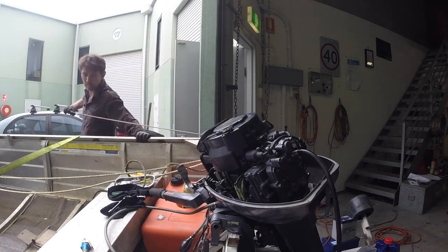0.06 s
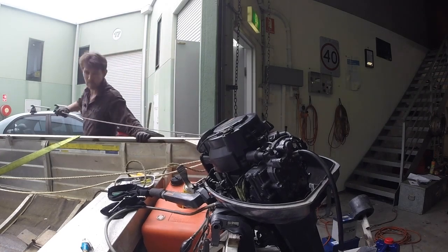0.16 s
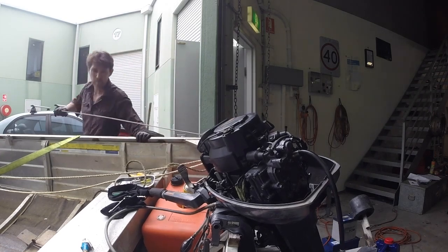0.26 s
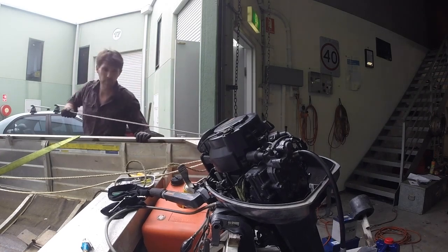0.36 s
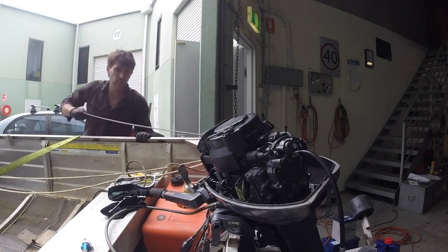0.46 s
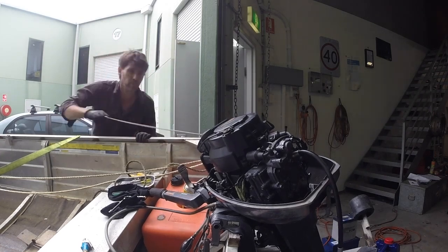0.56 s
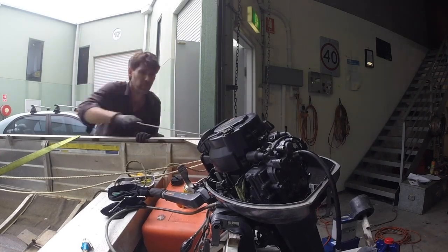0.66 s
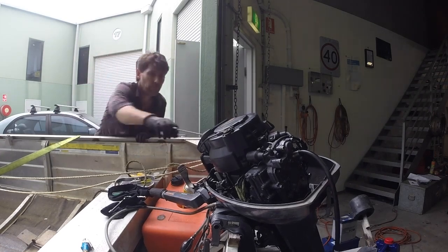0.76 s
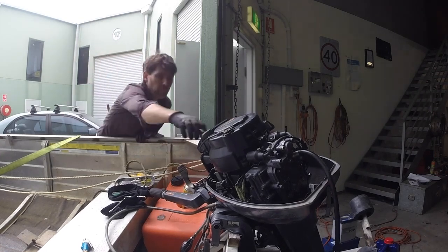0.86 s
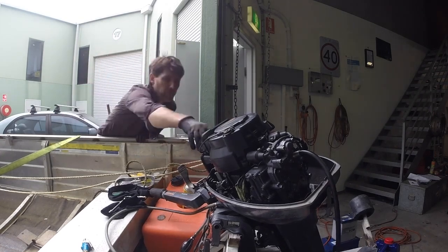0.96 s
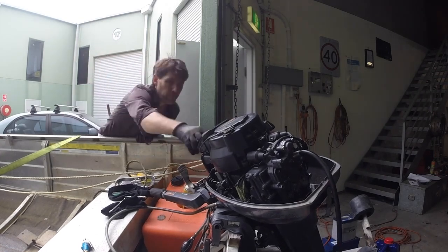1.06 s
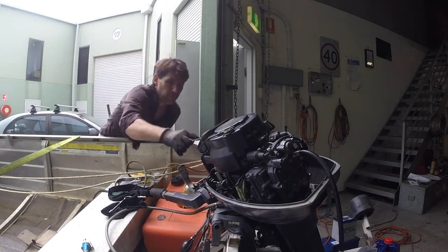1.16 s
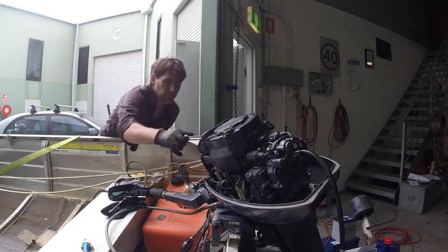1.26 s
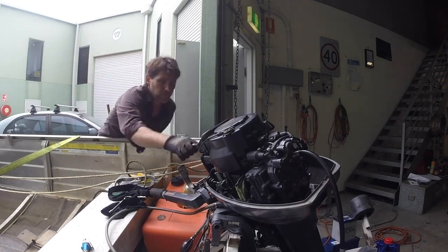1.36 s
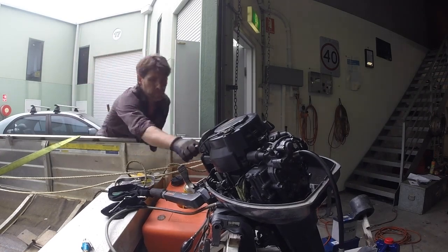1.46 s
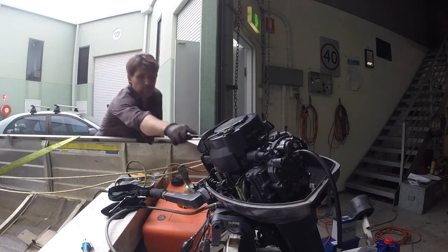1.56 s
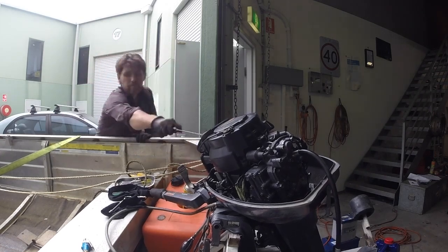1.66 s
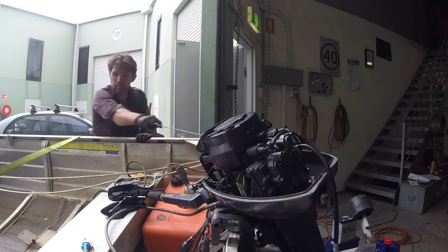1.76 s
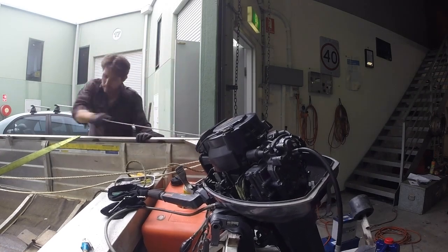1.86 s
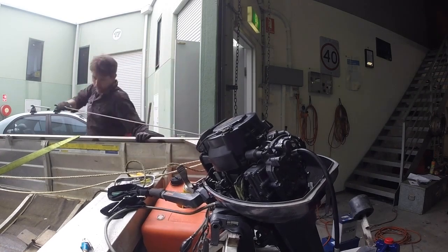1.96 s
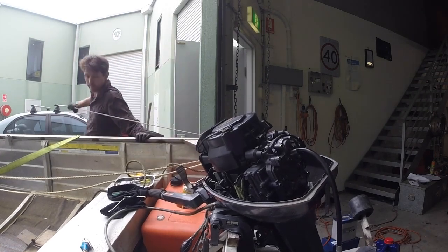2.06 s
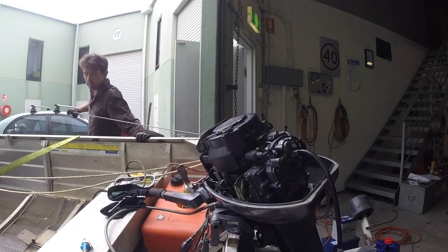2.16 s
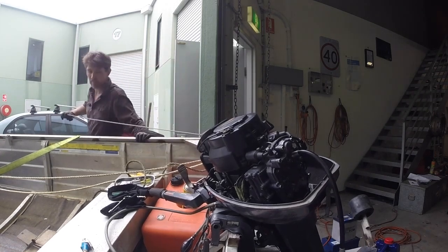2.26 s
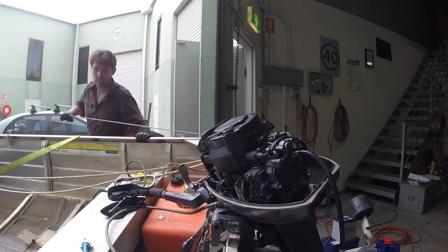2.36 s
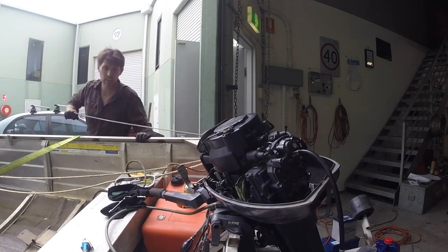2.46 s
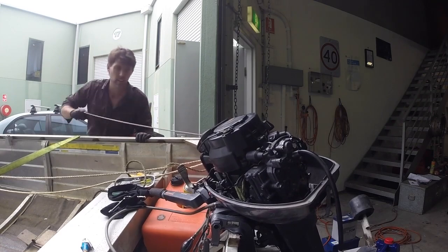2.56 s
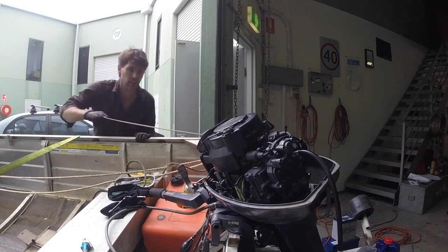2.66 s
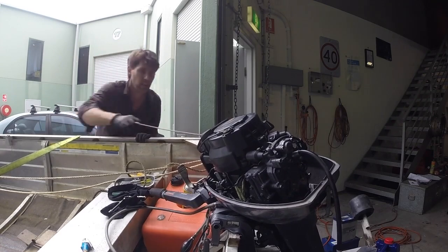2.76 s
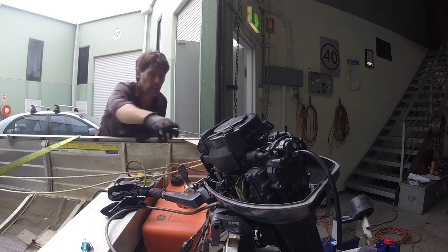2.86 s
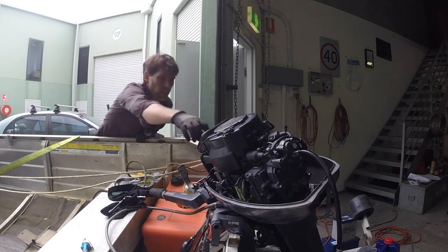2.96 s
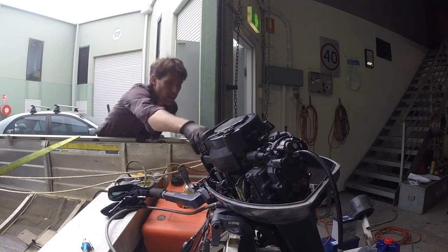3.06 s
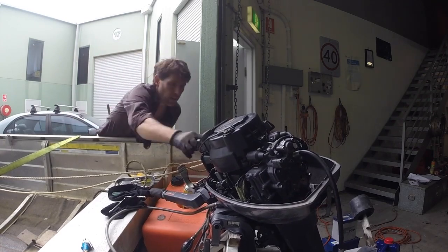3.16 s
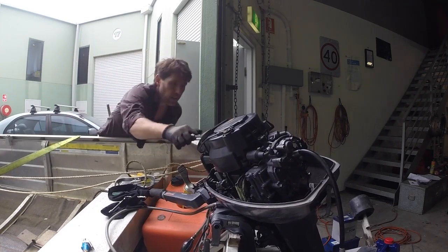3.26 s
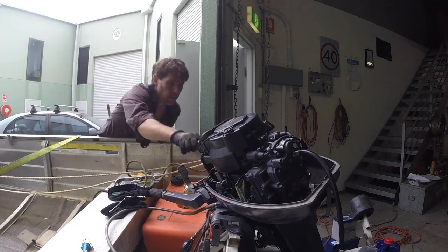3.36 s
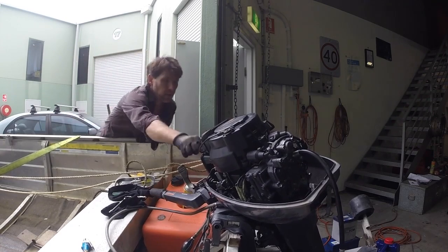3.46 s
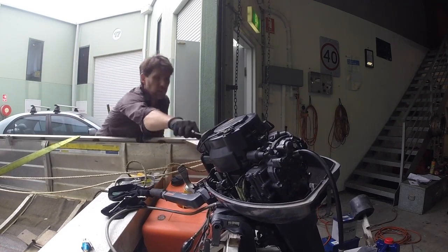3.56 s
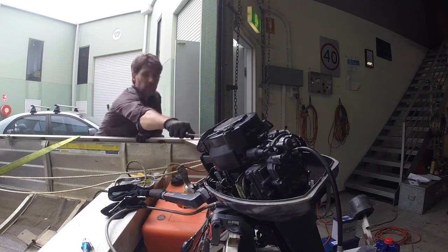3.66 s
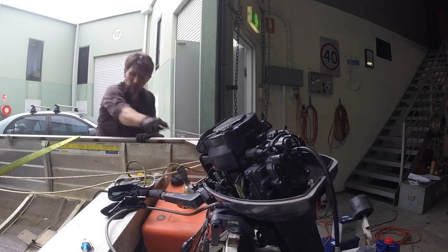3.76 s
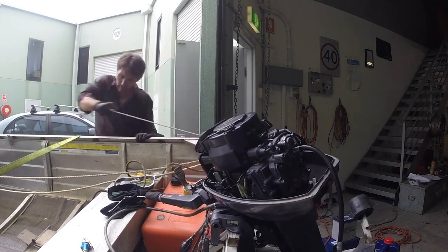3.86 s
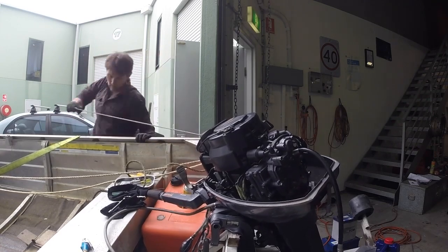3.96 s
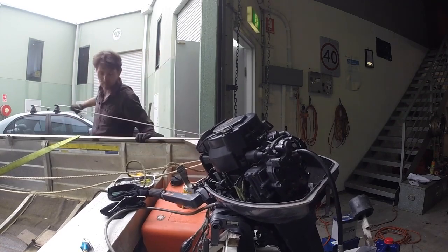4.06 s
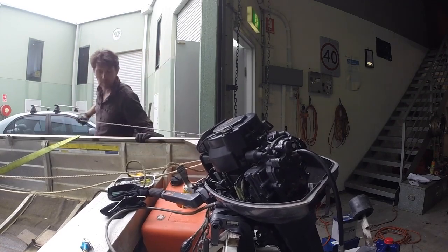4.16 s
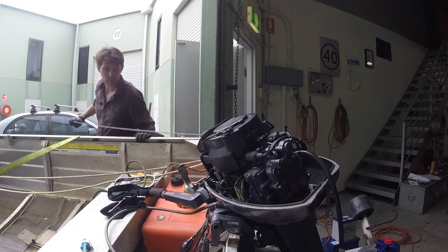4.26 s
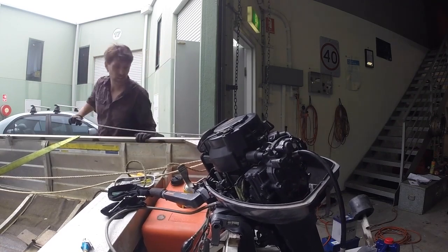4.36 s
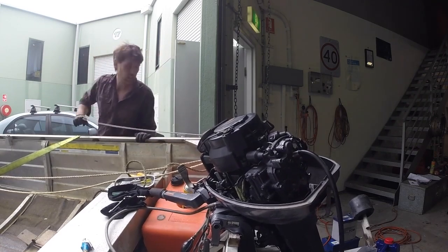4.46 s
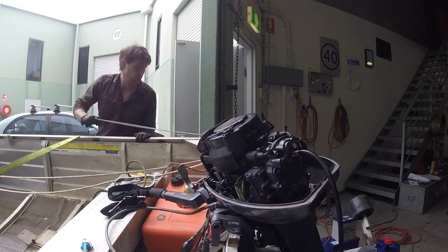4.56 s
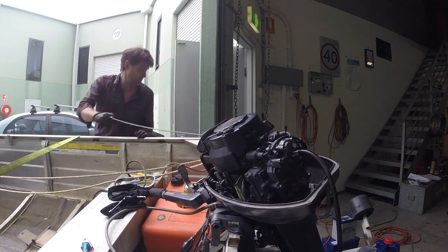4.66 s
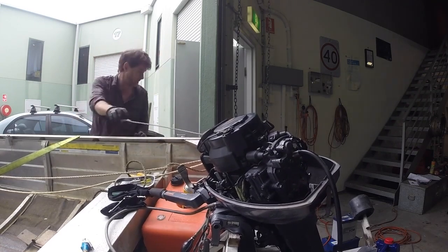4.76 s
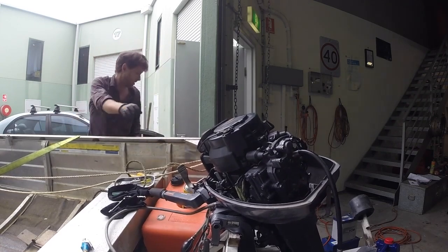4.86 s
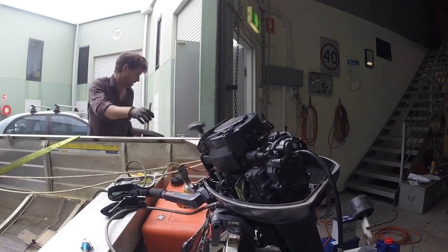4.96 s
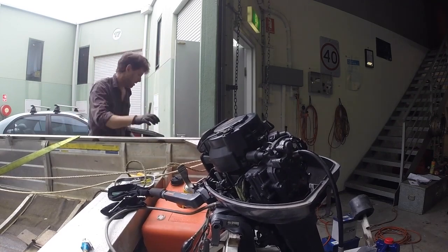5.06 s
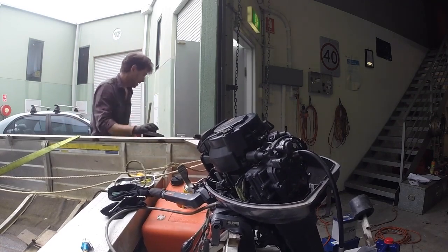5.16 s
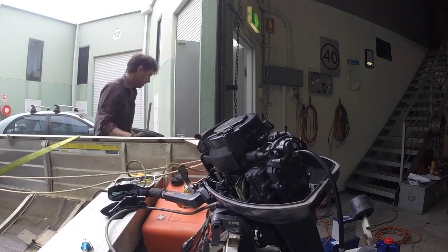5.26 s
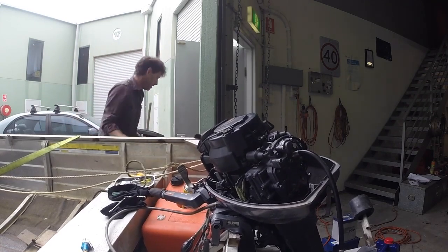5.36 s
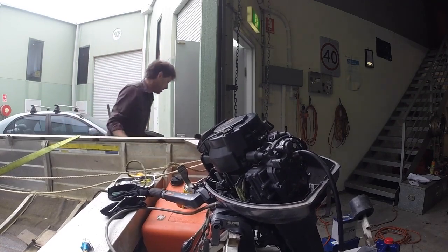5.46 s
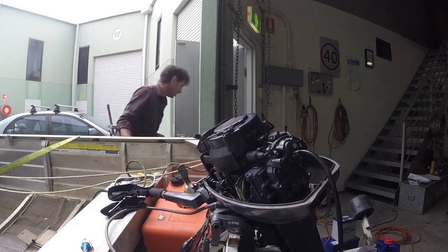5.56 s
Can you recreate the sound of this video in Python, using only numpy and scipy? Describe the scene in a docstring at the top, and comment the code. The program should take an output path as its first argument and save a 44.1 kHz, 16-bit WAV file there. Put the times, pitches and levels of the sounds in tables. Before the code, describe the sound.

Close to an uncovered small outboard in a workshop doorway, a starter rope is pulled three times, about two seconds apart. Each quick pull brings a rough rising whirr, fast metallic clatter and thumps, a hard clack at full stretch, then slowing knocks and spring scrape. The engine never fires; finally the handle rattles against the ringing housing. Faint yard noise behind.

```python
"""Outboard motor on its recoil starter

A small two-cylinder outboard motor, cowl off, is pulled over three times by its rope and does not fire. Crank
speed drives clatter, air noise, piston thumps and knocks; the rope whirrs as a frequency-modulated tone.
Between pulls the spring scrapes and groans through drum resonances, pawls ring and air noise sighs, mostly from
a leaking cylinder. At last the handle rattles home against the ringing housing. Hull reflections, workshop
echoes and steady yard noise lie behind."""
import sys
import numpy as np
from scipy import signal
from scipy.fft import rfft, irfft, next_fast_len
from scipy.io import wavfile
from scipy.ndimage import uniform_filter1d

SR = 44100
rng = np.random.default_rng(int(sys.argv[2]) if len(sys.argv) > 2 else 0)


def wrap_up_sound(samples):
    """Save the sound to the file named by the first command line argument, as 16-bit audio."""
    columns = np.atleast_2d(samples).T
    # keep every value between -1 and 1, then stretch to whole-number steps
    tamed = np.clip(columns, -1, 1)
    steps = np.round(tamed * 32767).astype(np.int16)
    wavfile.write(sys.argv[1], SR, steps)


N = 248139
TIME = np.arange(N) / SR
SIZE = next_fast_len(N + 2 * SR, real=True) // 2 * 2   # padded transform length, even
HZ = np.maximum(np.fft.rfftfreq(SIZE, 1 / SR), 1)

# pulls on the starter: rope runs out t/s, limiting speed/(turns/s), coasting time/s, crank angle then/turns
PULLS = [(.168, 13.17, .522, -.177), (2.204, 13.92, .724, .333), (4.24, 13.03, .679, .331)]
# bracket resonances: f/Hz, width/Hz (before any broadening), relative level/dB
BRACKET_MODES = [(413, 122, -0.5), (548, 60, 0.5), (783, 140, -5), (794, 57, 3), (1077, 43, -1.5),
                 (1420, 330, -24.5)]
# resonances of the steel parts: f/Hz, width/Hz, relative level/dB
STEEL_MODES = [(2840, 290, 3.5), (3690, 160, 0.5), (4030, 150, -0.5), (4800, 1600, -8), (6260, 220, 5.5),
               (7460, 1400, -6), (9200, 310, -4), (11210, 500, -2), (14500, 470, -6.5)]
# clatter of the turning crank: relative level at full speed/dB, exponent of speed
CLATTER_LAW = (-19, 1.456)
RATTLE_ABOVE = .3   # share of full speed below which drive and loose metal stay put


def from_db(db):
    """Decibels to amplitude ratio: 20 dB is a factor of ten."""
    return 10 ** (np.asarray(db) / 20)


def rms_one(x):
    """Normalisation to unit root mean square."""
    return x / np.sqrt(np.mean(x ** 2) + 1e-20)


def at_hz(points):
    """Linear interpolation over log frequency, read on the frequency grid."""
    hz, value = np.transpose(points)
    return np.interp(np.log(HZ), np.log(hz), value)


def level(tables, axis):
    """Envelope interpolated in decibels from one column; silent outside each table."""
    out = np.zeros(N)
    for rows in map(np.array, tables):
        out += from_db(np.interp(TIME, rows[:, 0], rows[:, axis], left=-150, right=-150))
    return uniform_filter1d(out, SR // 200)


def noise():
    """White noise: independent Gaussian samples with a flat spectrum."""
    return rng.standard_normal(N)


def drift(rate):
    """Low-pass noise of unit rms: smooth random variation up to about the given rate in Hz."""
    return rms_one(irfft(rfft(noise(), SIZE) / (1 + (HZ / rate) ** 2), SIZE)[:N])


def colour(x, spectrum):
    """Minimum-phase filter by the folded cepstrum, with unit power gain."""
    cepstrum = irfft(np.log(rms_one(from_db(at_hz(spectrum))) + 1e-6), SIZE)
    cepstrum[1:SIZE // 2] *= 2
    cepstrum[SIZE // 2 + 1:] = 0
    return irfft(rfft(x, SIZE) * np.exp(rfft(cepstrum)), SIZE)[:N]


def resonate(x, hz, width):
    """Two-pole resonance of about unit gain at its peak; the width sets the damping."""
    r = np.exp(-np.pi * width / SR)
    zeros = np.array([1, 0, -1]) * (1 - r * r) / 2
    poles = [1, -2 * r * np.cos(2 * np.pi * hz / SR), r * r]
    return signal.lfilter(zeros, poles, x + 1e-18)


def body(x, modes):
    """Modal superposition: parallel resonances, neighbours in opposite phase."""
    return sum((-1) ** k * from_db(db) * resonate(x, hz, width) for k, (hz, width, db) in enumerate(modes))


def ring_apart(modes, per_s, widen):
    """Independent excitation: each resonance, applied twice, gets its own random impacts."""
    out = 0
    for hz, width, db in modes:
        once = resonate(grains(per_s, spread_db=2.5), hz, widen * width)
        out = out + from_db(db) * resonate(once, hz, widen * width)
    return rms_one(out)


def bursts(rows, rise, decay):
    """Impact envelope: exponential rise and decay, in s, from each (t/s, level/dB)."""
    out, age = np.zeros(N), np.arange(SR // 5) / SR
    shape = (1 - np.exp(-age / rise)) * np.exp(-age / decay)
    for s, db in rows:
        part = out[max(int(s * SR), 0):][:len(age)]
        part += from_db(db) * shape[:len(part)]
    return out


def grains(per_s, spread_db):
    """Shot noise: random tiny contacts of uneven size and either sign, normalised to unit rms."""
    sizes = from_db(spread_db * np.minimum(rng.exponential(1, N), 3)) * rng.choice([-1, 1], N)
    return rms_one(sizes * (rng.random(N) < per_s / SR) / np.sqrt(per_s))


def yard():
    """Stationary background noise of the quiet yard, with a shaped spectrum."""
    # spectrum: f/Hz, relative level/dB
    yard_spectrum = [(25, -36.5), (70, -9), (150, 0.5), (300, -5.5), (700, -8.5), (1300, -9.5),
                     (2200, -18.5), (3300, -23), (7000, -24), (15500, -49.5)]
    return from_db(-59.5) * colour(noise(), yard_spectrum)


def workshop(x):
    """Reverberation: ten recirculating echo paths decay by frequency, then allpass filters smear them."""
    # reverberation time: f/Hz, t60/s
    room_t60 = [(100, 0.45), (1000, 0.75), (4000, 1), (8000, 0.19), (15000, 0.23)]
    t60, response = at_hz(room_t60), 0
    for k, lag in enumerate(rng.uniform(.012, .06, 10)):
        loop = from_db(-60 * lag / t60) * np.exp(-2j * np.pi * HZ * lag)
        response = response + (-1) ** k * loop / (1 - loop)
    for lag in rng.uniform(0.000998, .006, 3):   # clutter smears each echo
        delay = np.exp(-2j * np.pi * HZ * lag)
        response = response * (delay - .6) / (1 - .6 * delay)
    return irfft(rfft(x, SIZE) * response, SIZE)[:N]


def hull(x):
    """Early reflections: five delayed copies from the metal hull and the fuel tank."""
    response = sum(rng.choice([-1, 1]) * np.exp(-2j * np.pi * HZ * lag) for lag in rng.uniform(.002, .012, 5))
    return irfft(rfft(x, SIZE) * response, SIZE)[:N]


def housing():
    """Modal ringing: the handle snaps home and its rattle excites the starter housing."""
    # handle against the housing: t/s, relative level/dB
    handle_hits = [(5.075, -34), (5.114, -29.5), (5.18, -30), (5.215, -38)]
    # housing modes: f/Hz, relative level/dB, t60/s
    housing_modes = [(854, 2.5, 0.17), (901, -4, 0.24), (1025, 1, 0.24), (1090, -4, 0.26),
                     (1545, -3.5, 0.33), (2225, -3.5, 0.16), (3560, -12, 0.32), (3860, -12.5, 0.14)]
    rattle = noise() * bursts(handle_hits, rise=0.0017, decay=0.011)
    modes = [(hz, np.log(1000) / (np.pi * t60), db) for hz, db, t60 in housing_modes]   # t60 to width
    return from_db(33.5) * body(rattle, modes)


def swell(s, rise, db, fall_db_per_s):
    """Hiss envelope: opens at s, swells, holds, then decays exponentially."""
    swell_db, hold_s = 10.5, 0.036
    age = TIME - s
    loss_db = swell_db * np.clip(1 - age / rise, 0, 1) + fall_db_per_s * np.maximum(age - rise - hold_s, 0)
    return uniform_filter1d(from_db(db - loss_db) * (age > 0), SR // 200)


def sighs():
    """Leakage noise: mostly air squeezed past the rings, plus a short hiss as the rope takes up; the treble
    falls faster as each fades."""
    # hisses, mostly a compressed cylinder leaking, the one at 3.835 s the rope taking up: t/s, rise/s, relative
    # level/dB, relative treble level/dB
    hisses = [(1.322, 0.034, -29.5, -42), (3.338, 0.051, -29, -43.5), (3.835, 0.014, -50.5, -45.5),
              (5.02, 0.064, -27.5, -38)]
    # spectra of the main sound and of the treble: f/Hz, relative level/dB
    main_spectrum = [(60, -25.5), (120, -23.5), (175, -3.5), (280, -15.5), (520, 0), (800, 0.5),
                     (1220, -1.5), (1600, -1.5), (2200, -13), (3100, -8), (4500, -13.5), (6500, -26),
                     (10000, -46.5)]
    treble_spectrum = [(2650, -22.5), (4500, -11.5), (5650, 5), (11300, -6), (14300, -13.5), (15500, -28)]
    main_gain = sum(swell(s, rise, db, fall_db_per_s=122) for s, rise, db, _ in hisses)
    treble_gain = sum(swell(s, rise, db, fall_db_per_s=178.5) for s, rise, _, db in hisses)
    treble = colour(noise(), treble_spectrum) * treble_gain
    return colour(noise(), main_spectrum) * main_gain + from_db(-1.0) * treble


def rewinding():
    """Sliding speed as half-sine arches (peak 1), and the loudness as a power of that speed."""
    # spurts of rope and spring, mostly winding in: t/s, length/s, relative level/dB
    spurts = [(0.476, .15, -40.5), (0.617, 0.35, -37), (.955, 0.068, -38), (1.287, .05, -40),
              (1.903, 0.083, -31), (2.572, 0.19, -45), (2.752, .29, -38.5), (3.047, 0.046, -38.5),
              (3.824, 0.12, -44.5), (3.946, 0.076, -28.5), (4.663, 0.33, -46.5), (4.985, 0.055, -42)]
    arches = [(np.sin(np.pi * np.clip((TIME - s) / length, 0, 1)), db) for s, length, db in spurts]
    speed = sum(arch for arch, _ in arches)
    return speed, sum(from_db(db) * arch ** 0.42 for arch, db in arches)


def coil_ticks():
    """Impact excitation: spring coils tick at random while winding in, ringing steel resonances."""
    ticks = ring_apart(STEEL_MODES, per_s=8.7, widen=1)
    # heard through the starter housing
    muffled = signal.sosfilt(signal.butter(2, 6500, fs=SR, output="sos"), ticks)
    return from_db(-14) * rms_one(muffled) * rewinding()[1]


def recoil():
    """Friction noise and chatter: the spring scrapes in its resonant drum and groans under load."""
    # drum resonances: f/Hz, width/Hz, relative level/dB
    drum_modes = [(570, 383, 9), (767, 160, -13.5), (1330, 390, 9.5), (1778, 300, 2.5), (2840, 900, -0.5),
                  (3880, 440, -44), (6100, 2000, -14.5), (10700, 410, -14.5)]
    # spring chattering as it takes the load: t/s, length/s, relative level/dB
    groan_rows = [(0.446, 0.041, -34), (1.779, .072, -34), (3.844, 0.034, -39.5)]
    groan_hz = 550
    drum, flutter = 0, drift(35)
    for hz, width, db in drum_modes:   # coils touch here and there: each resonance also flutters by itself
        scrape = grains(per_s=2500, spread_db=2.5) * from_db(2 * flutter + 2.0 * drift(27))
        drum = drum + from_db(db) * resonate(resonate(scrape, hz, width), hz, width)
    drum = rms_one(drum)
    gate = level([[(s, db), (s + length, db - 2)] for s, length, db in groan_rows], axis=1)
    phase = 2 * np.pi * groan_hz * np.cumsum(1 + 0.0049 * drift(84)) / SR
    groan = gate * (from_db(9.0) * np.sin(phase) + from_db(-19.5) * drum)
    return from_db(2.0) * drum * rewinding()[1] + groan


def whirr(hz, loudness):
    """Random frequency modulation: the braid running over the guide gives a rough tone and its octave."""
    phase = 2 * np.pi * np.cumsum(hz * (1 + 0.022 * drift(250))) / SR
    fundamental = np.sin(phase) * loudness * from_db(2.5 + 3.1 * drift(120))
    # the octave stops growing with loudness above a cap
    octave = np.sin(2 * phase) * np.minimum(loudness, from_db(-21)) * from_db(-10 + 3.8 * drift(120))
    return fundamental + octave


def rope():
    """Frictional tone: a pitch contour for each pull going out, pitch tied to sliding speed coming back."""
    # whirr, alike on every pull: t before the rope runs out/s, f/Hz, relative level/dB
    contour = [(.28, 730, -33.5), (.225, 930, -27.5), (.195, 970, -18), (.165, 1090, -31.5),
               (.143, 1220, -14), (.127, 1250, -14), (.113, 1510, -19.5), (.085, 1400, -29),
               (.045, 1500, -22.5), (0.024, 1280, -31)]
    pulls = [[(end - before, hz, db) for before, hz, db in contour] for end, *_ in PULLS]
    s, hz, _ = np.concatenate(pulls).T
    going = whirr(np.interp(TIME, s, hz), level(pulls, axis=2))
    speed, gain = rewinding()
    return_hz = 1168 + 354 * speed ** 2
    return going + whirr(return_hz, from_db(-7) * gain)


def crank(end, top, coast, angle):
    """Flywheel kinematics: exponential spin-up under the rope, then coasting; share of speed, and turns."""
    pull_s, spin_up_s = .31, .079   # length of the pull, time constant
    spin_up = 1 - np.exp(-np.maximum(TIME - end + pull_s, 0) / spin_up_s)
    share = spin_up * np.clip(1 - (TIME - end) / coast, 0, 1) ** 2
    turns = top * np.cumsum(share) / SR
    return share, turns - np.interp(end, TIME, turns) + angle


def driven(law):
    """Power law: gain over time of a sound that follows the crank speed."""
    top_db, power = law
    return from_db(top_db) * sum(crank(*pull)[0] for pull in PULLS) ** power


def each_turn(angle, law, count=1, above=0):
    """Phase-locked events (t/s, level/dB): the crank passes an angle count times a turn; weaker if slow."""
    rows, (top_db, power) = [], law
    for pull in PULLS:
        share, turns = crank(*pull)
        passes = np.flatnonzero(np.diff(np.floor((turns - angle) * count)))
        rows += [(i / SR, top_db + 20 * power * np.log10(share[i])) for i in passes if share[i] > above]
    return rows


def strokes():
    """Compression events (t/s, level/dB): two piston strokes a turn, and single nudges."""
    # piston nudged against compression: t/s, relative level/dB
    nudges = [(1.035, -33), (1.918, -28), (1.983, -15), (2.517, -32), (3.41, -43), (3.49, -41.5),
              (3.844, -39.5), (3.883, -27.5), (4.532, -31)]
    # strokes: relative level at full speed/dB, exponent of speed
    stroke_law = (-21, 1.5)
    return each_turn(.06, stroke_law, count=2) + nudges   # angle in turns past the clack of loose metal


def clacks():
    """Impact noise: steel, pawls and the whole starter answer short noise bursts."""
    # hard clacks as the starter comes to rest: t/s, relative level/dB
    rest_clacks = [(0.9635, -28), (1.256, -30), (3.054, -32), (3.0726, -39), (3.3395, -37), (5.025, -22),
                   (5.0458, -22)]
    # pawls tinkling as they swing out or drop back: t/s, relative level/dB
    pings = [(.463, -29.5), (.484, -31.5), (1.243, -25.5), (2.772, -33), (3.309, -36), (3.838, -34),
             (4.394, -29), (4.977, -37), (5.004, -33)]
    # jolts of the whole starter as it catches or stops: t/s, relative level/dB
    jolt_rows = [(.985, -32.5), (1.257, -30), (1.97, -17), (3.056, -38.5), (3.143, -51.5), (3.341, -37.5),
                 (5.03, -24.5), (5.049, -23.5), (5.113, -22)]
    # pawl resonances: f/Hz, width/Hz, relative level/dB
    pawl_modes = [(2940, 93, 3), (5900, 130, -8.5), (11300, 200, -3), (11350, 270, -12.5)]
    # jolt spectrum: f/Hz, relative level/dB
    jolt_spectrum = [(120, -31.5), (200, -11.5), (488, -9.5), (1030, -5), (1380, 1), (1910, -1.5),
                     (2170, -14.5), (2960, -4.5), (3610, -9.5), (4030, -12), (5800, -15), (6240, -12),
                     (8980, -29.5), (11400, -29.5), (15500, -35.5)]
    # loose metal: relative level at full speed/dB, exponent of speed
    clack_law = (-8.5, 1.23)
    turning = each_turn(0, clack_law, above=RATTLE_ABOVE)
    # the rope runs out with a bang: a jolt, then a clack 3.3 ms later
    end_clacks = [(end + 0.0033, -8.5) for end, *_ in PULLS]
    end_jolts = [(end, -9.5) for end, *_ in PULLS]
    steel = body(noise() * bursts(turning + end_clacks + rest_clacks, rise=0.00091, decay=0.0025), STEEL_MODES)
    pawls = body(noise() * bursts(pings, rise=0.00086, decay=0.0044), pawl_modes)
    jolts = colour(noise() * bursts(end_jolts + jolt_rows, rise=.001, decay=0.008), jolt_spectrum)
    return from_db(8.5) * steel + from_db(15.0) * pawls + from_db(4.5) * jolts


def knocks():
    """Damped oscillation: each soft blow swells briefly at its own pitch and also shakes the bracket."""
    # flywheel rocks, starter takes up or drops its slack: t/s, relative level/dB, f/Hz
    slack_knocks = [(.336, -18, 550), (.375, -13.5, 544), (.444, -19.5, 505), (.556, -21, 550),
                    (1.775, -21.5, 580), (1.969, -14, 600), (2.43, -15.5, 554), (2.477, -16.5, 541),
                    (2.58, -20, 522), (2.659, -26, 890), (3.796, -33, 610), (3.837, -21, 570),
                    (3.875, -20.5, 763), (3.974, -14.5, 587), (4.004, -9, 530), (4.498, -20.5, 535),
                    (4.524, -19, 540), (4.606, -27, 986), (4.719, -30, 1640), (5.114, -13.5, 750)]
    # drive knock, once a turn: relative level at full speed/dB, exponent of speed
    knock_law = (-10, 1)
    drive_hz, drive_angle = 802, -.315   # angle in turns past the clack of loose metal
    out, blows, age = np.zeros(N), np.zeros(N), np.arange(SR // 12) / SR
    shape = (1 - np.exp(-age / 0.0015)) ** 2 * np.exp(-age / 0.0047)
    turning = [(s, db, drive_hz) for s, db in each_turn(drive_angle, knock_law, above=RATTLE_ABOVE)]
    for s, db, hz in turning + slack_knocks:
        out[int(s * SR):][:len(age)] += from_db(db + 7.5) * shape * np.sin(2 * np.pi * hz * age)
        blows[int(s * SR):][:len(age)] += from_db(db + 18.5) * shape * rng.standard_normal(len(age))
    return out + body(blows, BRACKET_MODES)


def mount_knocks():
    """Impact excitation: gears and mounts knock at random as the crank turns, ringing the bracket."""
    rings = ring_apart(BRACKET_MODES, per_s=22, widen=2.0)
    return from_db(-4.5) * rings * driven(CLATTER_LAW)


def pistons():
    """Damped oscillation: the two cylinders thump in turn, one generally deeper than the other."""
    out, age = np.zeros(N), np.arange(SR // 10) / SR
    for k, (s, db) in enumerate(strokes()):
        hz = (135, 95)[k % 2] * np.exp(0.13 * rng.standard_normal())
        thump = np.sin(2 * np.pi * hz * age) * (1 - np.exp(-age / 0.0026)) * np.exp(-age / 0.0083)
        out[int(s * SR):][:len(age)] += from_db(db + 5) * thump
    return out


def cranking():
    """Speed-driven noise: contacts thin out as the crank slows, air dulls, each stroke puffs in the rumble."""
    # spectra: f/Hz, relative level/dB
    clatter_spectrum = [(150, -32), (250, -5), (321, -7), (451, 0), (699, 1), (812, -3), (1020, 1),
                        (1100, -15.5), (1290, -4.5), (1900, -9), (2240, -17.5), (2920, -23), (5000, -32.5),
                        (6500, -37.5), (11000, -120)]
    air_spectrum = [(1470, -28), (2500, -3), (3890, -7.5), (4930, -12), (6390, -10), (7010, -13),
                    (9730, -16.5), (12900, -16), (15500, -17.5)]
    rumble_spectrum = [(30, -33.5), (50, -9), (80, -8), (135, 0.5), (220, -1.5), (330, -15.5), (550, -40.5)]
    # air and rumble: relative level at full speed/dB, exponent of speed
    air_law = (-31, 2.24)
    rumble_law = (-32.5, 1)
    puffs = bursts(strokes(), rise=0.0011, decay=0.014)
    drive, flow = driven(CLATTER_LAW), driven(air_law)
    contacts = grains(per_s=350 + 12000 * drive, spread_db=1.5)
    clatter = colour(contacts, clatter_spectrum) * drive * from_db(-2.0 + 2.0 * drift(41))
    hiss = colour(grains(per_s=8300, spread_db=0.0), air_spectrum) * from_db(3.5 + 2.64 * drift(46))
    dull = signal.sosfilt(signal.butter(1, 4500, fs=SR, output="sos"), hiss)
    brightness = np.clip(flow / from_db(-50), 0, 1)   # slow air loses its top
    air = flow * (dull + brightness * (hiss - dull))
    rumble = colour(noise() * (driven(rumble_law) + from_db(-5) * puffs), rumble_spectrum)
    return clatter + air + rumble


def scene():
    """Superposition: the motor close by, hull and workshop reflections around it, and the quiet yard."""
    engine = cranking() + mount_knocks() + pistons() + knocks() + clacks() + sighs()
    starter = rope() + recoil() + coil_ticks() + housing()
    motor = engine + starter
    return (motor + from_db(-19.0) * hull(motor) + from_db(-27) * workshop(motor) + yard())[None]


def record(dry):
    """Band limiting and soft saturation: a small microphone loses deep bass, rounds peaks, cuts the top."""
    thin = signal.sosfilt(signal.butter(4, 50, "high", fs=SR, output="sos"), dry)
    rounded = 1.042 * np.tanh(thin / 1.202)
    return signal.sosfilt(signal.ellip(10, .2, 80, 15700, fs=SR, output="sos"), rounded)


dry = scene()
out = record(dry)
wrap_up_sound(out)
```